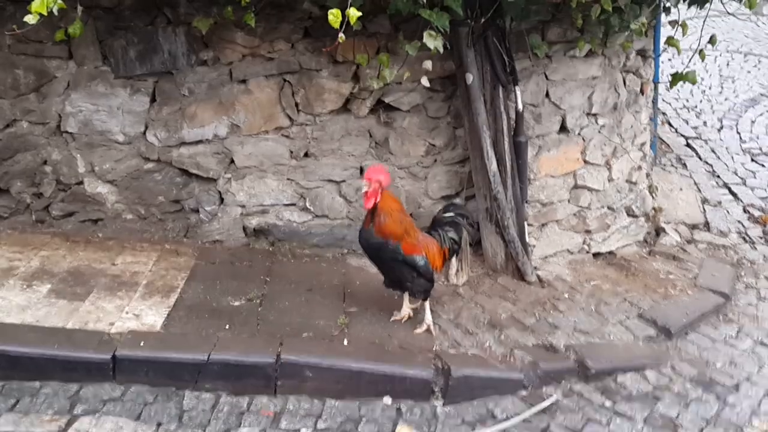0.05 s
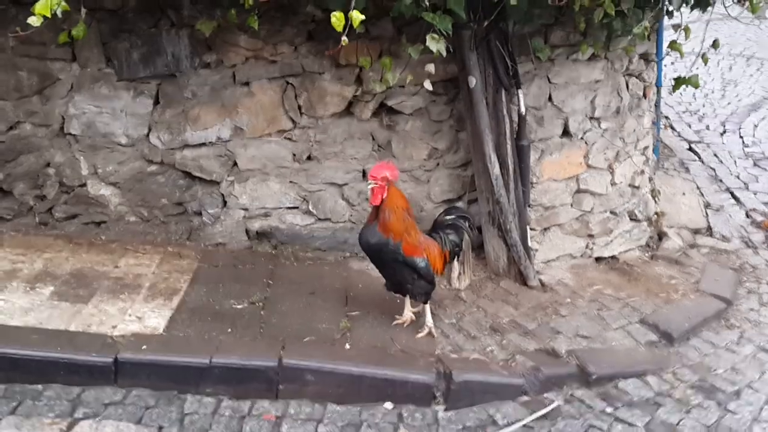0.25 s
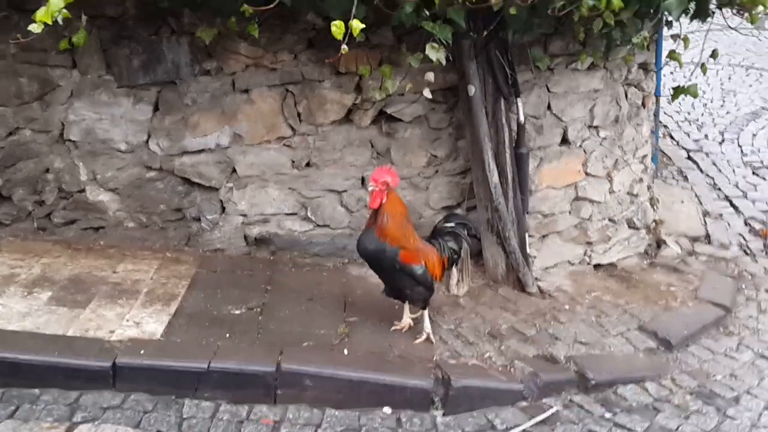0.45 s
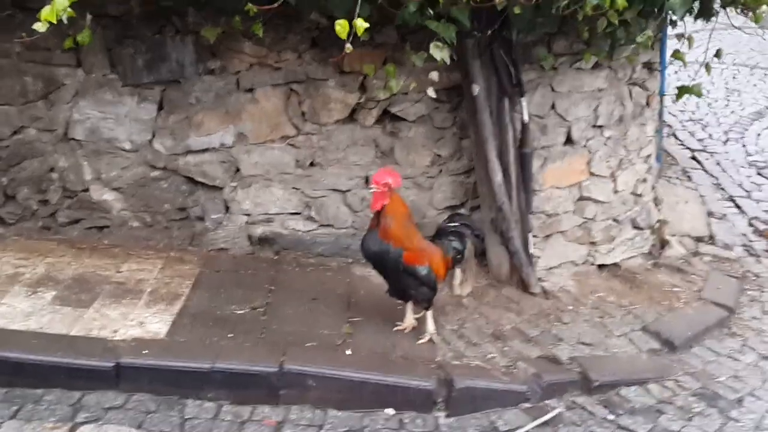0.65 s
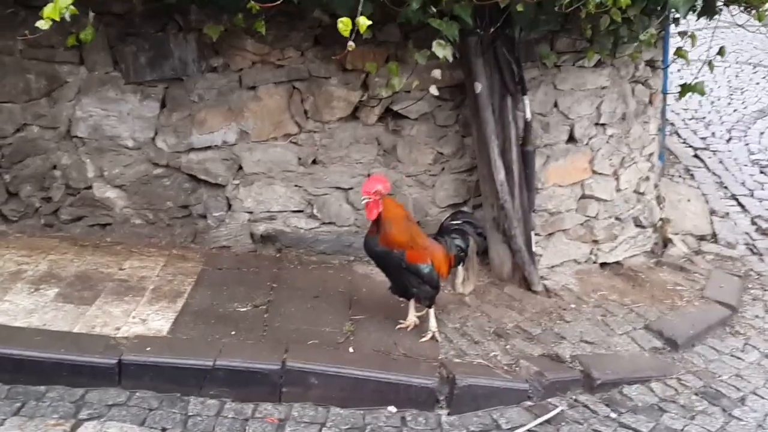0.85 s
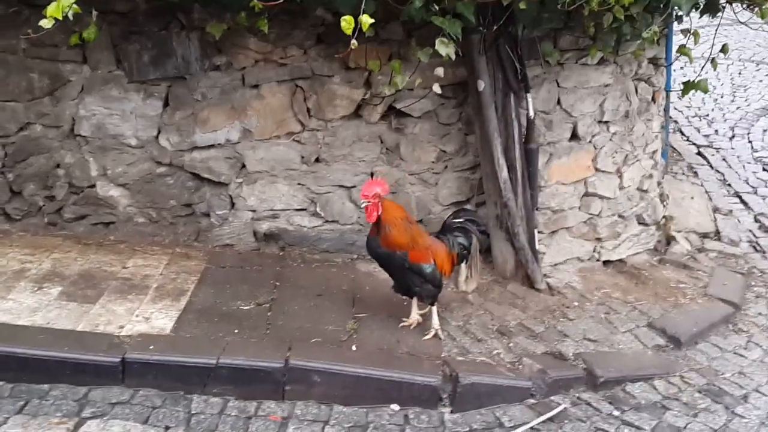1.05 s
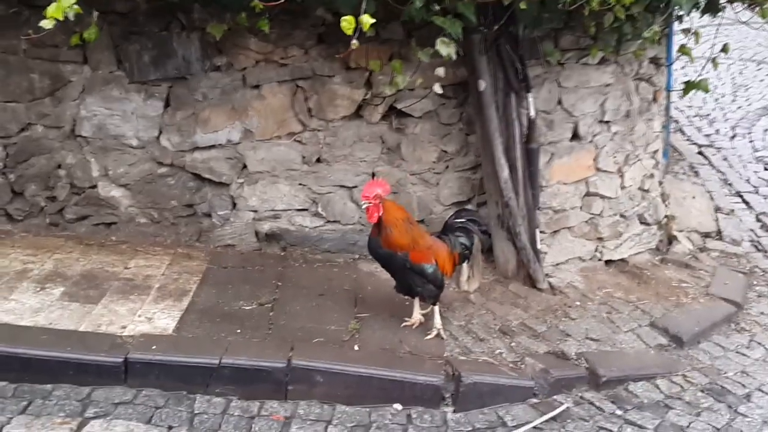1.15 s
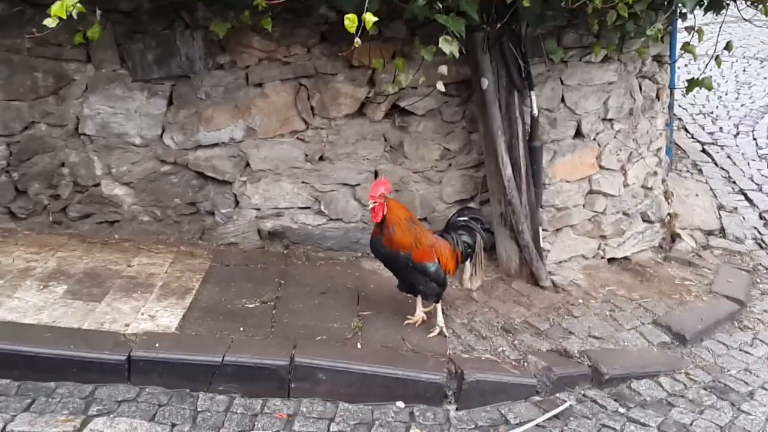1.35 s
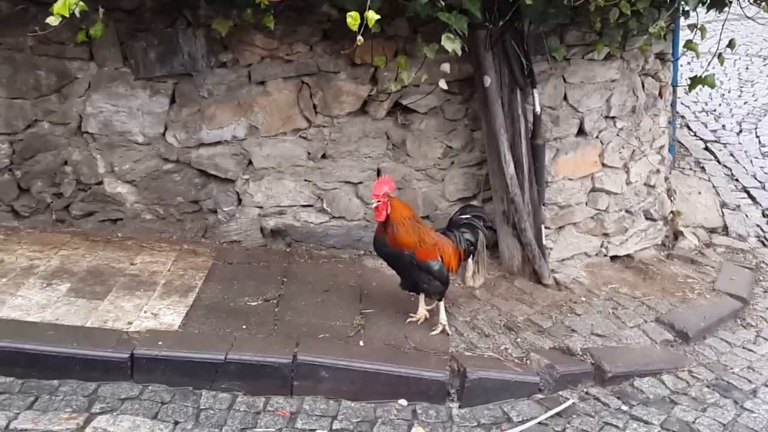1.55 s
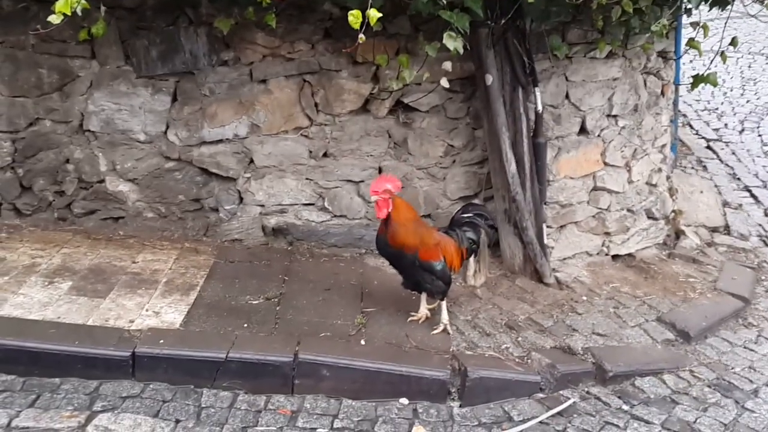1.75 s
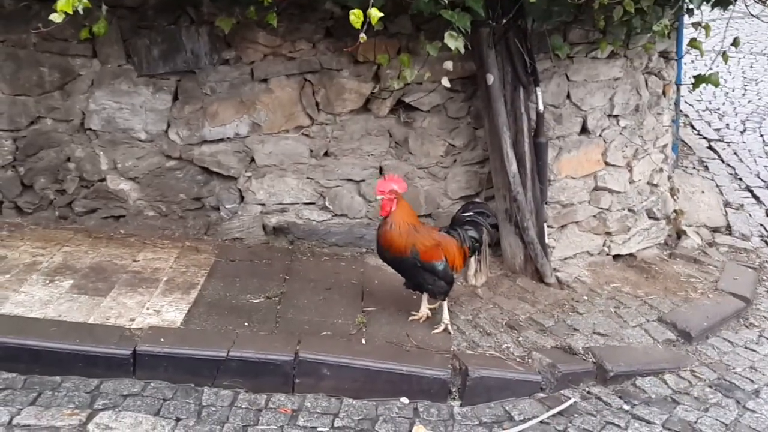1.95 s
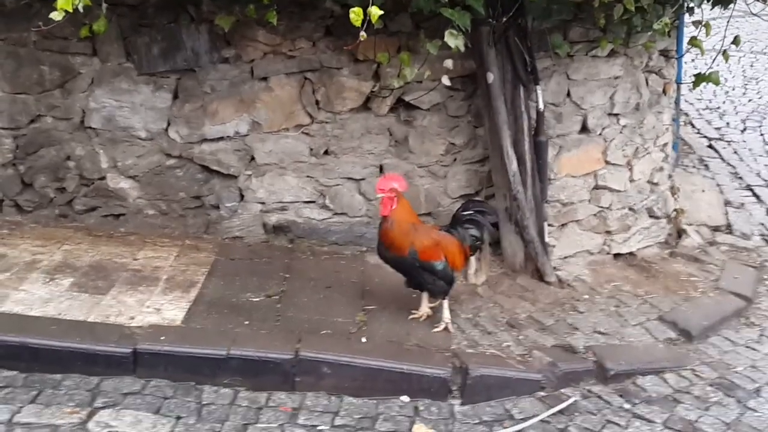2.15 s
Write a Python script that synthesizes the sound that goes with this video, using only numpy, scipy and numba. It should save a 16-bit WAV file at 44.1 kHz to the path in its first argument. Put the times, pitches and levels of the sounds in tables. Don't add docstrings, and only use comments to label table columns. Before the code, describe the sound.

Single loud rooster crow outdoors by a stone wall: quick rising syllables, then a long raspy held note that falls at the end, with slight hard reflections, soft distant hum and one grit tick, heard on a phone.

```python
import sys
import numpy as np
from scipy import signal
from scipy.io import wavfile
from scipy.ndimage import uniform_filter1d, minimum_filter1d
from numba import njit

SR = 44100
rng = np.random.default_rng(int(sys.argv[2]) if len(sys.argv) > 2 else 0)


def field_ratio(decibels):
    return 10 ** (np.asarray(decibels, dtype=float) / 20)


def master_out(mix):
    frames = np.transpose(np.atleast_2d(mix))
    ceiling = np.clip(frames, -1, 1)
    pcm = np.round(ceiling * 32767).astype(np.int16)
    wavfile.write(sys.argv[1], SR, pcm)


N = 97020


def level(x):
    return x / np.sqrt(np.mean(x ** 2))


def curves(table):
    rows = np.array(table).T
    time_s = np.arange(N) / SR
    return [np.interp(time_s, rows[0], column) for column in rows[1:]]


@njit
def svf(x, hz, width):
    y, band, low = np.empty(len(x)), 0., 0.
    for i in range(len(x)):
        g, damping = np.tan(np.pi * hz[i] / SR), width / hz[i]
        v = (band + g * (x[i] - low)) / (1 + g * (g + damping))
        band = 2 * v - band
        low = low + 2 * g * v
        y[i] = damping * v
    return y


def steep(x, hz, width_hz):
    hz = hz + np.zeros(N)
    return svf(svf(x, hz, 1. * width_hz), hz, 1. * width_hz)


def walk(rate_hz):
    hold = int(SR / rate_hz)
    steps = np.repeat(rng.standard_normal(N // hold + 1), hold)
    return level(uniform_filter1d(uniform_filter1d(steps, hold), hold)[:N])


def pan(db):
    return field_ratio(np.array([[db], [-db]]) / 2)


def bank(x, rows):
    out = 0
    for k, (hz, width_hz, db, pan_db) in enumerate(rows):
        out = out + (-1) ** k * field_ratio(db) * pan(pan_db) * steep(x, hz, width_hz)
    return out


def syrinx(hz, clear_db, hoarse_db, flap_hz):
    jitter, smear_rad = 0.00491, 0.3003
    phase = 2 * np.pi * np.cumsum(hz * (1 + jitter * walk(150))) / SR
    overtones = level(sum(np.cos(k * phase + smear_rad * k * k) for k in range(2, 19)))

    flap_wander, flap_tilt = .06, 0.91
    flap_phase = 2 * np.pi * np.cumsum(flap_hz * (1 + flap_wander * walk(70))) / SR
    flap = level(sum(flap_tilt ** k * np.cos(k * flap_phase) for k in range(1, 5)))
    scatter = level(svf(rng.standard_normal(N), hz / 4, 560.0))
    uneven = flap * field_ratio(0.62 * walk(60.37)) + field_ratio(-4) * scatter
    rasp = 1 + field_ratio(-3) * level(svf(rng.standard_normal(N), hz / 8, 450.0))

    beats = field_ratio(-8) * np.cos(phase) + overtones
    hoarse = level(beats * uneven) + field_ratio(-8) * rng.standard_normal(N)
    hoarse = hoarse * field_ratio(hoarse_db + 0.65 * walk(49.57))
    clear = np.cos(2 * phase + 4 * smear_rad) + field_ratio(3) * overtones * rasp
    return phase, hoarse, hoarse + field_ratio(clear_db - 14) * clear


def throat_and_beak(hoarse, drive, beak_hz, corner_db, lower_db, gape_db):
    # (centre [Hz], width [Hz], level [dB], left minus right [dB])
    lower = [(522, 96, -10, -2), (657.6, 90.4, -10, -7.5), (809, 105, -4, 5)]
    # (centre [Hz], width [Hz], level [dB], left minus right [dB])
    upper = [(1225.7, 149.6, -5.5, -10.5), (1520, 176, -3, -18.5), (1690, 73, -4.5, -13),
             (3720, 153, -21, -5), (4423, 506, -15, 8.5), (5643, 370, -19, -6)]
    # (centre [Hz], width [Hz], level [dB], left minus right [dB])
    gape = [(1087, 190, -12.5, -8), (1760, 195, -3.5, -9), (2128, 260, -28, -10)]
    # (centre [Hz], width [Hz], level [dB], left minus right [dB])
    treble = [(7010, 630, -27.5, 2), (7970, 350, -31, -8), (9036, 780, -26, -9.5),
              (10660, 1780, -32.5, -9.5), (11810, 660, -27, -4), (13950, 1600, -34, 0.5)]
    # (centre [Hz], width [Hz])
    pockets = [(950, 32), (2350, 59), (3000, 130), (3400, 230)]

    voice = bank(drive, upper) + field_ratio(lower_db) * bank(hoarse, lower) + field_ratio(gape_db) * bank(drive, gape)
    voice = voice + field_ratio(-7) * pan(-5) * steep(drive, beak_hz, 550)
    voice = voice + field_ratio(-6.5 + corner_db) * pan(-3.5) * steep(drive, 6121, 443)

    treble_shift, treble_wander = 0.46, 0.0092
    lift = (beak_hz[0] / beak_hz) ** treble_shift * (1 + treble_wander * walk(8.5))
    moving = [(hz * lift, width_hz, db - 2.5, pan_db) for hz, width_hz, db, pan_db in treble]
    corner_share = 0.27
    voice = voice + field_ratio(corner_share * corner_db) * bank(hoarse + drive, moving)

    for hz, width_hz in pockets:
        voice = voice - np.array([svf(v, hz + np.zeros(N), 1. * width_hz) for v in voice])
    nose = steep(hoarse, 2635, 163)
    return voice + field_ratio(-36.5 - corner_db) * nose


def windpipe(ring_hz):
    ring_width_hz, hold = 45.6, 1.4
    ring = signal.hilbert(level(steep(rng.standard_normal(N), ring_hz, ring_width_hz)))
    size = np.abs(ring) + 1e-9
    return level(ring.real / size * np.tanh(hold * size))


def rooster():
    # (time [s], pitch [Hz], fundamental [dB], clear overtones [dB], hoarse part [dB])
    crow = [(.158, 574.4, -47, -53, -39.5), (.194, 558.5, -33.5, -43, -27.5),
            (.21, 740.3, -35.5, -16.5, -34), (.228, 791.6, -36.5, -34, -23), (.335, 817, -34.5, -10, -19.5),
            (.358, 670, -24, -40, -23), (.42, 619.5, -47, -45, -37), (.444, 659, -20, -14, -20.5),
            (.466, 862.4, -22, -7, -32), (.518, 856.1, -20, -13.5, -20.5), (.545, 836.5, -25, -24, -18.5),
            (.83, 834, -26.5, -16.5, -18), (1.1, 853, -38, -26, -14.5), (1.74, 828.9, -51.5, -34.5, -16.5),
            (1.915, 743.1, -29.5, -48, -16.5), (1.93, 551, -25.5, -44, -30.5),
            (1.98, 542.6, -50.5, -68, -46), (2.17, 532.3, -57, -74, -78)]
    # (time [s], windpipe ring [Hz], ring level [dB], beak resonance [Hz],
    # mouth-corner gain [dB], lower throat gain [dB], gape gain [dB], flap rate [Hz])
    tract = [
        (.16, 1484, -38.5, 4980, -16, -11.5, 1, 240),
        (.43, 1520, -72, 4840, -2, 2.5, 4, 251.2),
        (.56, 1340, -21, 5000, 1, 2.5, 8, 255),
        (.87, 1342, -21, 4870, -2, -2.5, 3, 255.1),
        (.94, 1189, -27.5, 4983, -6, -2, -2, 258),
        (1.03, 1333, -21, 4913, -9, -7, -6.5, 261.9),
        (1.19, 1443, -19.5, 4742, -17, -6, -8, 269.9),
        (1.7, 1451, -12.5, 4799, -18.5, -11.5, -6, 268.8),
        (1.93, 1466, -21, 4890, -18.5, -4, -4.5, 268),
        (1.99, 1470, -57, 4843, -10, -10, 2, 264.6),
    ]
    hz, tone_db, clear_db, hoarse_db = curves(crow)
    ring_hz, ring_db, beak_hz, corner_db, lower_db, gape_db, flap_hz = curves(tract)

    phase, hoarse, drive = syrinx(hz, clear_db, hoarse_db, flap_hz)
    voice = throat_and_beak(hoarse, drive, beak_hz, corner_db, lower_db, gape_db)
    ring = field_ratio(ring_db) * pan(-7) * windpipe(ring_hz)
    tone = np.sqrt(2) * np.sin(phase) * field_ratio(tone_db + 1.6 * walk(40.32))
    bird = field_ratio(13) * voice + ring + pan(-5) * tone
    bird_low_hz = 398
    return signal.sosfilt(signal.butter(4, bird_low_hz, "high", fs=SR, output="sos"), bird)


def yard(x):
    # (delay [s], level from ahead [dB], level from the side [dB])
    echoes = [
        (.0016, -16, -28),
        (.0037, -32.5, -3),
        (.0071, -8, -4),
        (0.0112, -4, -10),
    ]
    tail_db, t60_s, top_hz, side_low_hz = -11, 0.26, 6400, 2630
    t = np.arange(SR // 2) / SR
    tail = rng.standard_normal((2, len(t))) * field_ratio(-60 * t / t60_s) * np.minimum(t / 0.0072, 1)
    tail = signal.lfilter(*signal.butter(1, top_hz, fs=SR), tail)
    tail = field_ratio(tail_db) * tail / np.sqrt(np.sum(tail ** 2, axis=1, keepdims=True))
    for delay_s, mid_db, side_db in echoes:
        tail[:, int(delay_s * SR)] += field_ratio(np.array([mid_db, side_db])) * [1, -1]
    mid, side = signal.fftconvolve(tail, x.mean(axis=0, keepdims=True), axes=1)[:, :N]
    side = signal.lfilter(*signal.butter(3, side_low_hz, "high", fs=SR), side)
    return x + field_ratio(-3) * mid + field_ratio(-2.0) * side * np.array([[1], [-1]])


def street():
    # (frequency [Hz], level [dB])
    spectrum = [(30, -15), (75, -5.5), (200, -8.5), (420, -15.5), (1100, -12), (3900, -18), (4600, -34.5),
                (15000, -38)]
    # (time [s], level [dB])
    gain = [
        (.16, -19),
        (.3, -1.5),
        (1.85, -2),
        (2.02, 3),
    ]
    hum_db, swell_db, flicker_db, side_full_hz = -43, 1.5, 1.8, 1400
    out, swell, rows = 0, walk(3.06), np.array(spectrum).T
    for hz in 35 * 2 ** np.arange(0, 8.9, .5):
        mid, side = (steep(rng.standard_normal(N), hz, hz / 2) for _ in range(2))
        db = np.interp(np.log(hz), np.log(rows[0]), rows[1])
        db = db + swell_db * swell + flicker_db * walk(11.28)
        width = min(hz / side_full_hz, 1.2)
        out = out + field_ratio(db) * (mid + width * side * np.array([[1], [-1]]))
    return level(out) * field_ratio(hum_db + curves(gain)[0])


def tick():
    start_s, decay_s, centre_hz, width_hz = 2.029, 0.00081, 9100, 12750.0
    t = np.maximum(np.arange(N) / SR - start_s, 0)
    grit = rng.standard_normal((2, N)) * np.exp(-t / decay_s) * (t > 0)
    return field_ratio(-23.5) * np.array([svf(g, centre_hz + np.zeros(N), width_hz) for g in grit])


def scene():
    return yard(rooster()) + street() + tick()


def low_pass(x):
    return signal.sosfilt(signal.butter(12, 16510, fs=SR, output="sos"), x)


def record(dry):
    start_s, mic_low_hz, top_hz = .158, 54.6, 16400
    gate = np.clip((np.arange(N) / SR - start_s) / 0.001, 0, 1)
    heard = signal.lfilter(*signal.butter(2, mic_low_hz, "high", fs=SR), dry * gate)
    limit, limit_s = .86, .003
    span = int(limit_s * SR)
    room = np.minimum(limit / (np.abs(heard).max(axis=0) + 1e-9), 1)
    heard = heard * uniform_filter1d(minimum_filter1d(room, size=2 * span), size=span)
    heard = signal.sosfilt(signal.butter(10, top_hz, fs=SR, output="sos"), heard)
    return low_pass(heard)


dry = scene()
out = record(dry)
master_out(out)
```